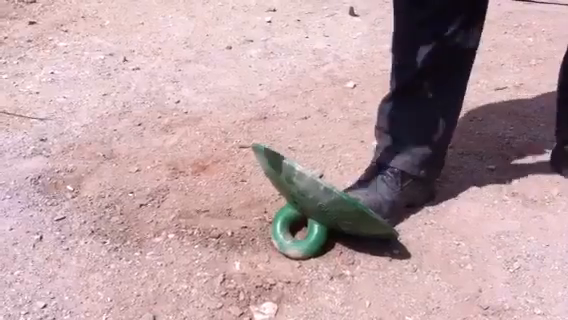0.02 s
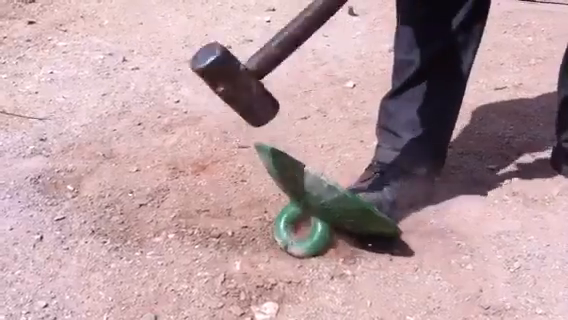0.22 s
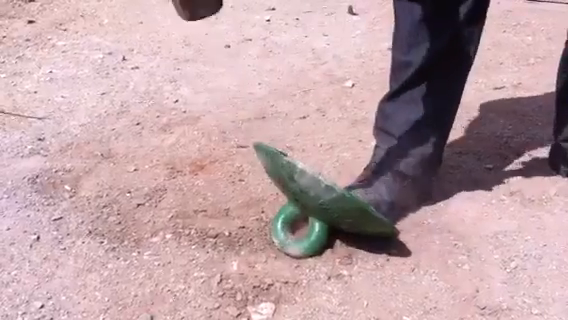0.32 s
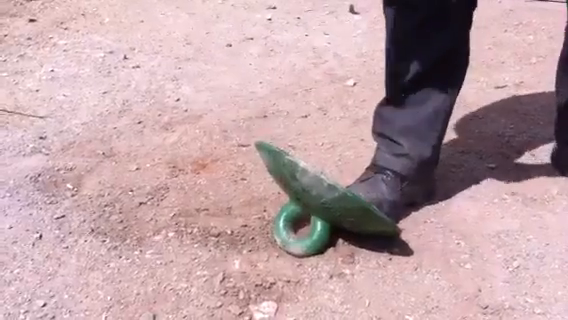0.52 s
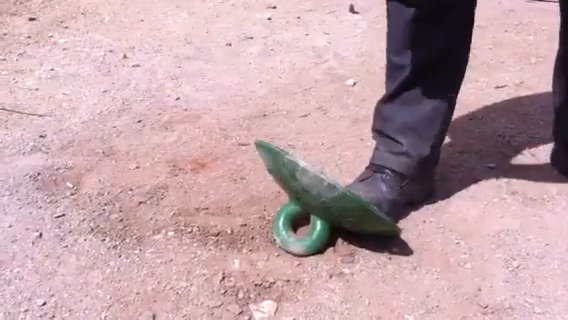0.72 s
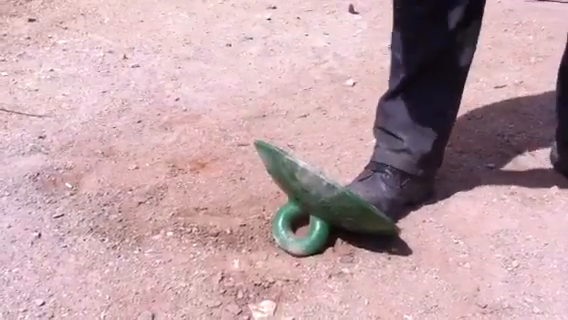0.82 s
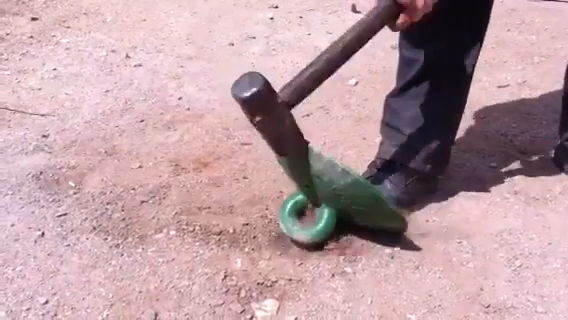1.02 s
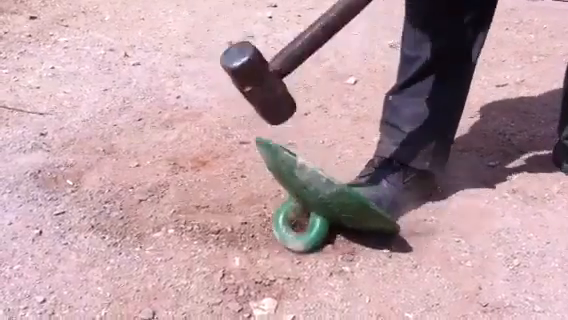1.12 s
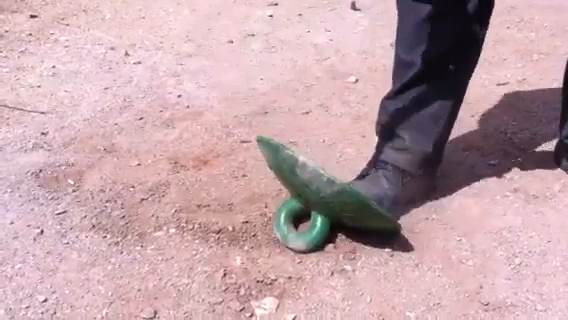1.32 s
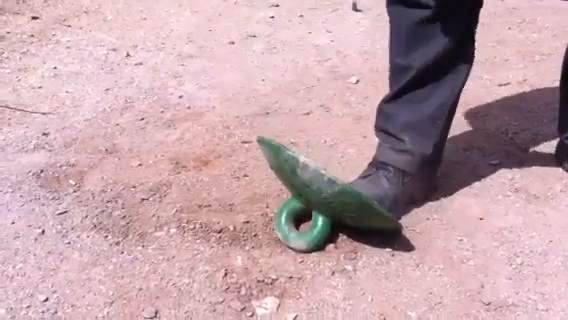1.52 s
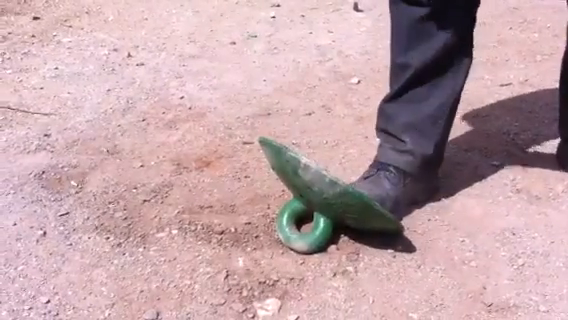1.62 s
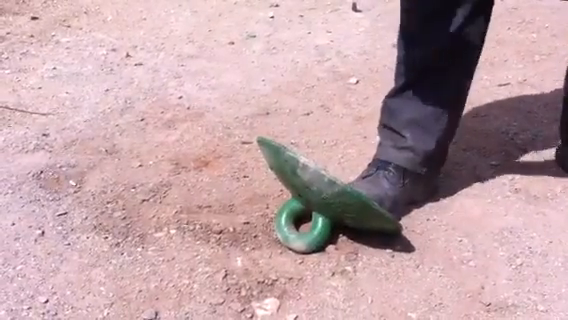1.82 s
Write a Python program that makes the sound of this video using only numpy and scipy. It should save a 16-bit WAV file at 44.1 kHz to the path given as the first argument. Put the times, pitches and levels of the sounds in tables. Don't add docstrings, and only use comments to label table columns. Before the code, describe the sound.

A sledgehammer hits a cast steel disc on gravel, close and slightly overloaded. Faint sparrow chirps come first over distant traffic; at 0.2 s a sharp clang cracks, thuds and rings briefly, with rattle, far-wall echoes and a faint high wavering hammer-head tone. Leaves hiss in a light gust from 0.9 s. A second, similar clang lands at 1.13 s and decays; a faint distant thump comes near 1.9 s.

```python
import sys
import numpy as np
from scipy import signal
from scipy.fft import rfft, irfft, next_fast_len
from scipy.io import wavfile
from scipy.ndimage import uniform_filter1d, map_coordinates

SR = 44100
rng = np.random.default_rng(int(sys.argv[2]) if len(sys.argv) > 2 else 0)


def log_audio(samples):
    frames = np.atleast_2d(samples).T
    limited = np.clip(frames, -1, 1)
    pcm = np.round(limited * 32767).astype(np.int16)
    wavfile.write(sys.argv[1], SR, pcm)


def voltage_ratio(decibels):
    exponent = np.asarray(decibels, float) / 20
    return 10 ** exponent


N = 83790

# t/s, peak level/dB
BLOWS = [
    (0.21, -2),
    (1.1354, -3.5),
]
RING_DB = -6.5


def unit(x):
    return x / np.sqrt(np.mean(x ** 2) + 1e-20)


def along(points, hz):
    f, v = np.transpose(points)
    return np.interp(np.log(hz + 1), np.log(f + 1), v)


def curves(rows):
    s, *cols = np.transpose(rows)
    return [np.interp(np.arange(N) / SR, s, c) for c in cols]


def wobble(rate_hz):
    knots = rng.standard_normal(int(N * rate_hz / SR) + 4)
    return map_coordinates(knots, [np.arange(N) * rate_hz / SR])


def noise(length, spectrum, t60=None, patchy_db=0):
    hz, t, z = signal.stft(rng.standard_normal(length + 256), SR, nperseg=256)
    patches = uniform_filter1d(rng.standard_normal(z.shape), 3, 0)
    patches = uniform_filter1d(patches, 20, 1, mode='wrap')
    z = z * voltage_ratio(along(spectrum, hz))[:, None] * voltage_ratio(patchy_db * unit(patches))
    scale = np.sqrt(np.mean(signal.istft(z, nperseg=256)[1] ** 2))
    if t60:
        z = z * voltage_ratio(-60 * t / np.maximum(along(t60, hz), .01)[:, None])
    return signal.istft(z, nperseg=256)[1][:length] / scale


def add(x, s, y):
    part = x[round(s * SR):][:len(y)]
    part += y[:len(part)]


def background():
    # f/Hz, density/dB
    traffic = [(25, -45.5), (90, -12), (150, 0), (445, -9), (2100, -12), (3100, -25), (4300, -18),
               (16500, -44)]
    # f/Hz, density/dB
    leaves = [(2500, -17.5), (4000, -1), (7000, 1), (11000, -5.5), (15500, -9.5), (16200, -38.5)]
    # t/s, level/dB
    gust = [(0, -69.5), (.85, -71), (.87, -62.5), (1.1, -60.5), (1.5, -64.5), (1.65, -67.5), (1.9, -78.5)]
    m = next_fast_len(N + 8192)
    road = rfft(noise(N, [(100, 0)], patchy_db=1.5), m)
    road = irfft(road * voltage_ratio(along(traffic, np.fft.rfftfreq(m, 1 / SR))), m)[:N]
    gust_db, = curves(gust)
    road_db = -55 + 0.23 * (gust_db - gust_db.mean())
    return voltage_ratio(road_db) * unit(road) + voltage_ratio(gust_db) * noise(N, leaves, patchy_db=3.0)


def sparrows():
    # t/s, length/s, start f/Hz, end f/Hz, level/dB
    chirps = [(.025, 0.02, 4140, 4100, -65), (0.044, 0.015, 4470, 4250, -65),
              (0.066, 0.023, 3900, 4050, -69), (0.081, 0.017, 3980, 4200, -50),
              (.092, .026, 4150, 4190, -50), (0.11, 0.017, 4860, 4900, -62.5), (.112, .02, 4180, 4230, -58),
              (0.128, 0.02, 4130, 4250, -53.5), (0.123, 0.02, 3080, 3600, -61),
              (0.14, .016, 3700, 3800, -60.5), (0.143, 0.015, 4330, 5000, -57),
              (0.15, 0.017, 4760, 3100, -61.5), (0.17, .012, 3473, 3233, -64.5),
              (0.163, .028, 4320, 4070, -66)]
    out = np.zeros(N)
    for s, length_s, from_hz, to_hz, db in chirps:
        n = round(length_s * SR)
        cycles = np.cumsum(np.linspace(from_hz, to_hz, n)) / SR
        add(out, s, voltage_ratio(db + 2.5) * np.hanning(n) ** 1.3 * np.sin(2 * np.pi * cycles))
    tail = noise(SR // 8, [(100, 0)], [(4000, .15)])
    return out + voltage_ratio(-1.0) * signal.fftconvolve(out, tail / np.linalg.norm(tail))[:N]


def hammer():
    # t/s, direct path speed/(m/s), ground path speed/(m/s)
    lift_m_s = [
        [(.21, 0, 0), (.3, .5, -.6), (.4, 1.4, -.8), (.48, 2.2, -.6), (.55, 3, .2), (.65, 3, 0)],
        [(1.135, 0, 0), (1.22, 0, -.2), (1.35, 1.8, -1), (1.45, 2.6, 0), (1.55, 3.6, 1), (1.63, 2.6, 1),
         (1.75, .8, 1), (1.9, -2.8, 1)],
    ]
    # t/s, direct level/dB, ground level/dB
    turn_db = [
        [(.21, -69, -69), (.3, -65, -67), (.42, -71, -59), (.48, -68.5, -75.5), (.56, -85.5, -76),
         (.62, -80, -83), (.68, -99, -92.5)],
        [(1.135, -38, -52), (1.28, -57.5, -64), (1.38, -52, -57), (1.47, -64, -53.5), (1.55, -64.5, -79),
         (1.59, -69.5, -59.5), (1.62, -62, -93), (1.72, -59, -85.5), (1.9, -62.5, -94)],
    ]
    head_hz = [8635, 13385]
    upper_start_db = [-8.5, 3]
    deep_start_db = [13, 12]
    deep_fade_db_s = [45, 120]
    deep_hz, upper_fade_db_s = 3705, 59.5
    waver_db, sound_m_s = 1.3, 343
    out, t = np.zeros(N), np.arange(N) / SR
    for lift, turn, start_db, deep_db, fade_db_s in zip(
            lift_m_s, turn_db, upper_start_db, deep_start_db, deep_fade_db_s):
        age = t - lift[0][0]
        for speed, db in zip(curves(lift), curves(turn)):
            clock = np.cumsum(1 - speed / sound_m_s) / SR
            low, high = (np.sin(2 * np.pi * (hz * clock + rng.random())) for hz in head_hz)
            upper_db = start_db - upper_fade_db_s * np.abs(age)
            out += (age > 0) * voltage_ratio(db + waver_db * wobble(41)) * (low + voltage_ratio(upper_db) * high)
            deep = np.sin(2 * np.pi * (deep_hz * clock + rng.random()))
            level_db = turn[0][2] + deep_db - fade_db_s * np.abs(age)
            out += (age > 0) * voltage_ratio(level_db + waver_db * wobble(48)) * deep
    return out


def bump(hz):
    u = np.arange(round(0.018 * SR)) / SR
    return np.hanning(len(u)) * (np.sin(2 * np.pi * hz * u) + 0.51 * np.sin(2 * np.pi * 2.5 * hz * u))


def yard(struck):
    # f/Hz, t60/s
    yard_t60 = [(150, .3), (500, 1.2), (2500, 1.6), (5000, 0.82), (9000, .2), (15000, .1)]
    # f/Hz, level/dB
    yard_colour = [(150, -8), (450, -1), (680, -2), (1000, -8.5), (1450, -3), (2000, -5), (3100, -8),
                   (4300, -5), (9000, -3)]
    hold_s = 0.34
    t = np.arange(len(struck)) / SR
    tail = noise(len(t), yard_colour, yard_t60) / (1 + (t / hold_s) ** 4)
    return signal.fftconvolve(struck, tail / np.linalg.norm(tail))[:len(t)]


def thud(t, blow):
    thud_hz = [208, 238]
    thud_db = [-16.5, -10]
    thud_t60_s = [0.079, 0.054]
    return voltage_ratio(thud_db[blow] - 60 * t / thud_t60_s[blow]) * np.sin(2 * np.pi * thud_hz[blow] * t)


def swarm(t, colour, count):
    # f/Hz, t60/s
    swarm_t60 = [(300, 0.12), (2000, 0.049), (6000, 0.2), (16000, .1)]
    draw = rng.random((count, 4))
    hz = 3000 + 13000 * draw[:, :1] ** 1.5
    t60_s = along(swarm_t60, hz) * (.5 + draw[:, 2:3])
    db = along(colour, hz) - 14 * draw[:, 1:2] - 60 * t / t60_s
    return (voltage_ratio(db) * np.sin(2 * np.pi * (hz * t + draw[:, 3:]))).sum(0)


def crack(t, blow, settle_s):
    # f/Hz, density/dB
    crack_spectra = [
        [(59, -48), (100, -21), (2120, -7), (3250, -13), (4780, -10.5), (6180, -18.5), (6870, -11.5),
         (14200, -35), (16500, -41.5)],
        [(59, -40.5), (100, -19), (900, -8.5), (2680, -6.5), (3180, -19), (4780, -3.5), (6180, -17),
         (13900, -22.5), (16500, -31.5)],
    ]
    # f/Hz, level/dB
    dip = [(450, 0), (630, -6), (820, 0), (1250, 0), (1600, -6), (2000, 0)]
    # f/Hz, t60/s
    crack_t60 = [(100, 0.066), (600, 0.057), (3000, 0.021), (15000, 0.04)]
    # f/Hz, t60/s
    rattle_t60 = [(300, 0.22), (2000, 0.74), (5000, 0.091), (9000, 0.13), (16000, .08)]
    spectrum = crack_spectra[blow]
    colour = [(f, along(spectrum, f) + along(dip, f)) for f in np.geomspace(50, 17000, 90)]
    rattle = voltage_ratio(-18.5) * noise(len(t), colour, rattle_t60, patchy_db=2)
    rattle = rattle / (1 + (t / settle_s) ** 8)
    return rattle + noise(len(t), colour, crack_t60) + voltage_ratio(-20) * swarm(t, colour, count=120)


def pressed(t, blow):
    # f/Hz, first blow level/dB, second blow level/dB, t60/s
    pressed_modes = [(491, -15.5, -19.5, 0.12), (997, -13, -10, .06), (1097, -7.5, -8.5, 0.092),
                     (1999, -6.5, -11.5, 0.12), (2208, -2, -33.5, 0.024), (2776, -13.5, -1.5, .09),
                     (4732, 6.5, 2, 0.052), (5030, -7.5, -13.5, .06), (5310, -22.5, -6, 0.063),
                     (7210, -10.5, -19, .06)]
    hz, *level_db, t60_s = np.transpose(pressed_modes)[:, :, None]
    tones = np.sin(2 * np.pi * (hz * t + rng.random(hz.shape)))
    return (voltage_ratio(RING_DB + level_db[blow] - 60 * t / t60_s) * tones).sum(0)


def disc(t, blow, settle_s):
    low_hz = [711, 1228, 1950, 2065, 2207, 2501, 2546, 2770, 3712, 3865, 4265, 4473, 4760, 5160]
    # first blow level/dB, second blow level/dB, t60/s
    disc_modes = [(-16, -11, 0.21), (-4, 2.5, 0.15), (-30, -24.5, 0.94), (-16, -24.5, 0.19),
                  (-23, -20, 0.066), (-7.5, -2, 0.22), (-16.5, -20, .5), (-30.5, -22.5, 0.45),
                  (-22.5, -30, .5), (-35, -16.5, 0.24), (-4.5, -4, 0.46), (-2.5, -6, 0.32),
                  (-13.5, -15, 0.42), (-13.5, -15.5, 0.31),
                  (-21, -17.5, .18), (-23.5, -15, 0.36), (-27.5, -36, 0.46), (-21.5, -6, 0.16),
                 (-25, -17.5, 0.21), (-24.5, -36.5, 0.2), (-24.5, -44, 0.12), (-46.5, -38, 0.25),
                 (-29, -32, 0.4), (-22.5, -20.5, 0.32), (-28, -30, 0.35), (-36, -31.5, 0.47),
                 (-23.5, -37.5, .14), (-30, -22.5, 0.17),
                  (-27.5, -23.5, 0.33), (-31.5, -30, .13), (-40, -45, .2), (-29, -19, 0.29),
                 (-23.5, -29, 0.18), (-34.5, -20, 0.18), (-34, -35, .18), (-22, -36, .13),
                 (-31, -32.5, .15), (-22.5, -13.5, .4), (-33, -50, .1), (-27, -18, .15), (-39, -32.5, 0.37)]
    mid_hz = [5412, 5465, 5910, 6665, 6858, 7075, 7680, 8050, 8296, 8484, 8760, 9141, 9604, 9830]
    high_hz = [10350, 10800, 11530, 11990, 12110, 12450, 12890, 13400, 13640, 14155, 14600, 15110, 15620]
    rest_damping = 1.45
    rock_peak_db, rock_hz = 2, 22
    release_s, release_soft_s = 0.0064, .002
    hz = np.concatenate([low_hz, mid_hz, high_hz])[:, None]
    *levels_db, t60_s = np.array(disc_modes).T[:, :, None]
    phase = rng.uniform(0, 2 * np.pi, hz.shape)
    age = t + (rest_damping - 1) * np.maximum(t - settle_s, 0)
    rock = np.sin(2 * np.pi * rock_hz * (.5 + phase / np.pi) * t + phase)
    rock_db = rock_peak_db * np.minimum(t / settle_s, 1) * rock
    level_db = RING_DB + levels_db[blow] + rock_db - 60 * age / t60_s
    ring = (voltage_ratio(level_db) * np.sin(2 * np.pi * hz * t + phase)).sum(0)
    return ring / (1 + np.exp((release_s - t) / release_soft_s)) + pressed(t, blow)


def blows():
    settle_times_s = [.076, .082]
    settle_hz = [137, 166.5]
    settle_db = [-37.5, -36]
    # delay/s, level/dB
    echoes = [(.115, -36), (0.199, -35.5), (.245, -35)]
    yard_trim_db = [-4.5, 0]
    attack_s, settle_lag_s = 0.00056, 0.0073
    push_lead_s, push_hz, push_db = .0008, 1330, -7
    yard_db, yard_ring_db, echo_top_hz = -20, -6.5, 2440
    out, t = np.zeros(N), np.arange(int(.75 * SR)) / SR
    wall = signal.butter(2, echo_top_hz, fs=SR, output='sos')
    touch = np.sin(2 * np.pi * push_hz * np.arange(round(SR / push_hz)) / SR)
    for blow, ((s, db), settle_s) in enumerate(zip(BLOWS, settle_times_s)):
        rise = voltage_ratio(db) * (1 - np.exp(-t / attack_s))
        ring = rise * disc(t, blow, settle_s)
        contact = rise * crack(t, blow, settle_s)
        add(out, s - push_lead_s, voltage_ratio(db + push_db) * touch)
        add(out, s, ring + contact + rise * thud(t, blow))
        answer = yard(contact + voltage_ratio(yard_ring_db) * ring)
        add(out, s + 0.011, voltage_ratio(yard_db + yard_trim_db[blow]) * answer)
        dull = signal.sosfilt(wall, ring * np.minimum(t / 0.018, 1))
        for delay_s, echo_db in echoes:
            add(out, s + delay_s, voltage_ratio(echo_db) * dull)
        add(out, s + settle_s + settle_lag_s, voltage_ratio(db + settle_db[blow]) * bump(settle_hz[blow]))
    add(out, 1.875, voltage_ratio(-47) * bump(137))
    return out


def scene():
    return (background() + sparrows() + hammer() + blows())[None]


def top_cut(x):
    return signal.sosfilt(signal.butter(12, 17110, fs=SR, output="sos"), x)


def record(dry):
    # from t/s, to t/s, kept below f/Hz
    dropouts = [
        (.191, .2058, 700),
        (1.12, 1.1313, 0),
    ]
    # f/Hz, density/dB
    lead_hiss = [(500, -10.5), (2000, -6.5), (5000, 1), (12000, -7), (16500, -13)]
    clip_top, clip_hard = .62, 6
    mic_low_hz, mic_top_hz = 70, 16400
    t, hz = np.arange(N) / SR, np.fft.rfftfreq(N, 1 / SR)
    x = dry / (1 + np.abs(dry / clip_top) ** clip_hard) ** (1 / clip_hard)
    for (start_s, stop_s, kept_hz), (blow_s, _) in zip(dropouts, BLOWS):
        gate = uniform_filter1d(((t > start_s) & (t < stop_s)) * 1., size=40)
        low = irfft(rfft(x * (t < stop_s)) * (hz < kept_hz), N)
        ramp = np.clip((t - stop_s) / (blow_s - stop_s), 0, 1) * (t < blow_s + .001)
        x = x - gate * (x - low) + voltage_ratio(-33) * ramp ** 0.21 * noise(N, lead_hiss)
    mic = 1j * hz / (mic_low_hz + 1j * hz) / (1 + (hz / mic_top_hz) ** 80)
    return top_cut(irfft(rfft(x) * mic, N))


dry = scene()
out = record(dry)
log_audio(out)
```